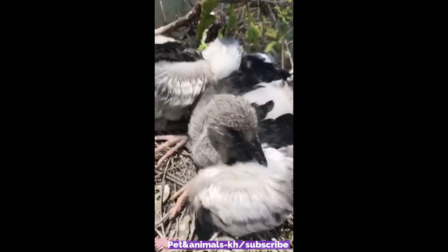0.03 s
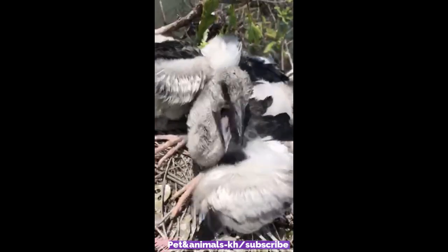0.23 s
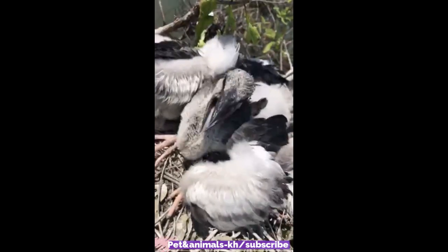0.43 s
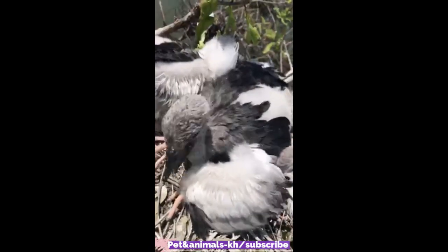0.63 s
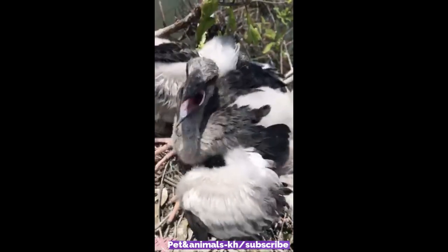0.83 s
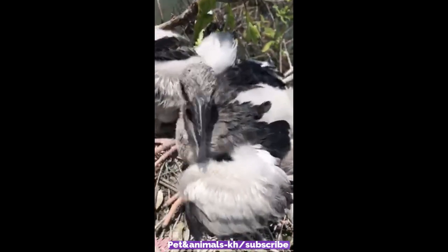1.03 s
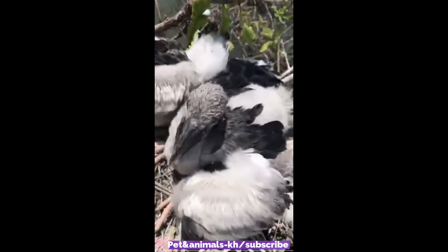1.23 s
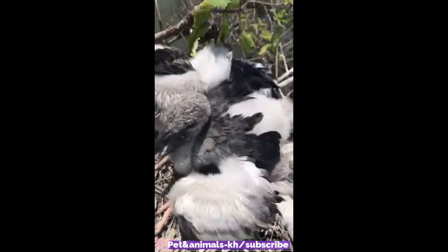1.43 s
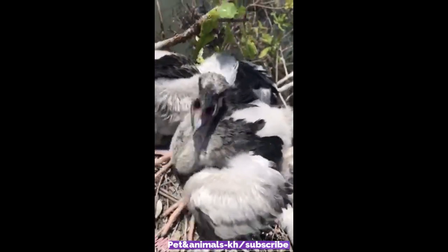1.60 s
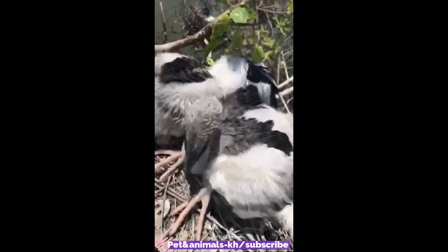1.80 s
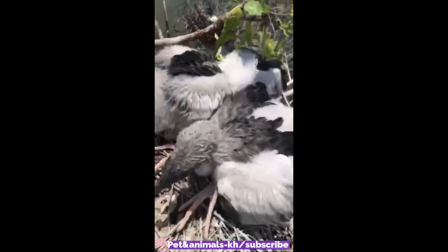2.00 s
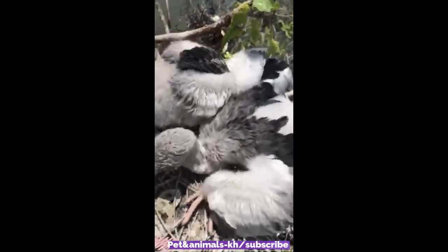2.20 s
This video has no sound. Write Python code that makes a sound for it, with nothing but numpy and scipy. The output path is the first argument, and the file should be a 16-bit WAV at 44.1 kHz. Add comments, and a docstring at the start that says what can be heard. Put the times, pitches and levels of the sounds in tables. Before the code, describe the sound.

Young storks cluck harshly in a nest among branches, twelve quick raspy calls in an even series, close and straight ahead. Feathers brush softly now and then, while light wind, a faint hum and a far bird sit underneath.

```python
"""Stork nestlings beg close by: twelve harsh clucks, about six a second.
Each cluck is a rattle of throat pulses that breaks into pairs, catches for an instant and trails off.
The pulses make the throat and bill ring, and the bill's opening colours the sound.
Twigs and branches scatter it. Feathers rustle softly, and behind lie faint wind, a low hum
and three chirps of a far bird."""
import sys
import numpy as np
from scipy import signal
from scipy.fft import rfft, irfft, next_fast_len
from scipy.io import wavfile
from scipy.ndimage import map_coordinates

SR = 44100
rng = np.random.default_rng(int(sys.argv[2]) if len(sys.argv) > 2 else 0)


def transcribe(signal):
    """Save signal, clipped to [-1, 1], as a 16-bit WAV file at the path in sys.argv[1]."""
    frames = np.atleast_2d(signal).T
    limited = np.clip(frames, -1, 1)
    pcm = np.round(limited * 32767).astype(np.int16)
    wavfile.write(sys.argv[1], SR, pcm)


N = 103635
T = np.arange(N) / SR
SIZE = 8192  # samples set aside for one cluck
HZ = np.fft.rfftfreq(SIZE, 1 / SR)

# Tone colour of the wind: (frequency [Hz], relative level [dB])
WIND_COLOUR = [(15, -37), (25, -13.5), (55, 2.5), (110, -2.5), (180, -4.5), (300, -5), (600, -4.5),
               (760, -9), (1100, -12), (1800, -16), (2700, -13), (3600, -16), (4400, -20), (5800, -21.5),
               (8600, -26.5), (9600, -42.5), (12000, -58.5), (15500, -65)]
# The wind's stereo spread: (frequency [Hz], side level against the middle [dB])
WIND_SPREAD = [(30, -22), (50, -14.5), (85, -17), (200, -14.5), (600, -21.5), (3000, -33.5), (12000, -24.5)]
# Loudness of the wind: (time [s], level [dB])
WIND_LEVEL = [(0, -64.5), (.5, -64.5), (1.0, -65.5), (1.35, -64), (1.75, -65), (2.2, -62), (2.35, -64)]
# Chirps of the far bird: (start [s], length [s], first pitch [Hz], last pitch [Hz], level [dB])
FAR_CHIRPS = [(.0, 0.12, 3880, 2410, -82), (.62, .06, 2980, 2670, -67.5), (1.342, 0.078, 3140, 2760, -66)]
# Feather rustles: (peak time [s], half length [s], level [dB], centre frequency [Hz])
FEATHER_RUSTLES = [(0.006, 0.025, -65.5, 3520), (1.354, 0.028, -63, 4800), (2.177, 0.017, -60, 4880)]
# Lone pulses just ahead of a cluck: (time [s], level [dB], cluck number [from 0])
LONE_PULSES = [(0.189, -44, 0), (1.4178, -42.5, 7)]
# Clucks: (start [s], swell time [s], last pulse before the catch [s], tail fade time [s], level [dB],
# relative tail level [dB], pulse rate [Hz], flutter depth [dB], limp depth [dB])
CLUCK_RHYTHMS = [(0.2002, 0.0027, .2298, 0.027, -39.5, -7.5, 374.6, 23, 17),
                 (0.361, 0.012, .3976, 0.038, -40, -5.5, 325.3, 24, 2.5),
                 (0.5308, 0.0067, .5813, .020, -38, -8.5, 318.8, 14, -3.5),
                 (0.685, 0.012, .7413, 0.034, -37.5, -9, 339.4, 9.5, 5),
                 (0.847, .013, .8968, 0.032, -36, -7.5, 340.5, 2, 6.5),
                 (1.0280, 0.0041, 1.0713, 0.028, -36.5, -15, 352.4, 5, 7),
                 (1.1760, 0.0081, 1.2203, 0.029, -35, -10.5, 357.5, 2.5, 9),
                 (1.4319, 0.003, 1.4677, 0.029, -36.5, -13.5, 316.9, 6, 6),
                 (1.5836, 0.012, 1.6310, 0.019, -38, -3, 343.5, 12, 0),
                 (1.7680, 0.0083, 1.8068, 0.027, -37.5, -7, 315.4, 1, 2),
                 (1.925, 0.0068, 1.9780, .024, -37, -12, 343, 3, -2),
                 (2.08, 0.011, 2.1240, 0.023, -34.5, -7.5, 336.1, 2, 6)]
# Ringing tones of throat and bill, a row per cluck, with levels against the main tone:
# (main tone [Hz], upper tone [dB], 2nd tone [Hz], 2nd tone [dB], 3rd tone [Hz], 3rd tone [dB],
# 4th tone [Hz], 4th tone [dB], treble [dB], treble edge [Hz])
BILL_SHAPES = [(648, 2.5, 2110, -2, 2850, -6.5, 3690, -7.5, -17.5, 6430),
               (597, 0, 1870, -7.5, 3050, -3, 3780, -5, -12, 10100),
               (700, -4, 2030, -6, 3250, -2, 3900, -1.5, -11.5, 9200),
               (676, 3, 2170, -1, 2750, -3, 3900, -5.5, -14, 5960),
               (625, -1.5, 1890, -7, 3070, 1, 3900, -4, -14, 10000),
               (643, -0.5, 1980, -5, 2850, -4, 3400, 0, -13, 7000),
               (640, 3, 2120, 0, 2820, -3, 3610, 1, -18, 6200),
               (660, 5.5, 2285, 2.5, 2820, -4, 3820, -6.5, -12, 5030),
               (614, -1, 1830, -8.5, 3090, -0.5, 4020, -5, -11.5, 9200),
               (617, 3, 2060, -3.5, 2950, -2, 3690, -2.5, -13, 6250),
               (650, 5.5, 2060, -1.5, 2420, 4.5, 3640, -6.5, -14.5, 5200),
               (636, 3, 2190, 2.5, 2470, 2, 4700, -13.5, -17.5, 4860)]
# The sharp click in each pulse: (frequency [Hz], relative level [dB])
CLICK_COLOUR = [(100, -36.5), (1300, -9.5), (2800, -8), (4500, -1.5), (5300, -3), (6500, -1), (9000, -24.5)]
# The faint fizz in each pulse: (frequency [Hz], relative level [dB])
FIZZ_COLOUR = [(100, -56), (1400, -31), (5000, -26.5), (8300, -33.5), (9300, -52.5), (12000, -52.5),
               (15500, -64.5)]
# Tone colour of the echo from the branches: (frequency [Hz], gain [dB])
ECHO_COLOUR = [(150, -4.5), (380, -8), (700, 21), (1200, -14), (3000, -2.5), (8000, -11.5)]


def amp(db):
    """Turn decibels into a gain."""
    return 10 ** (np.asarray(db) / 20)


def unit(x):
    """Scale a signal to an average (rms) level of 1."""
    return x / np.sqrt(np.mean(x ** 2) + 1e-20)


def along(points, hz):
    """Read between (frequency, value) points on a log frequency axis."""
    freqs, values = np.transpose(points)
    return np.interp(np.log(hz + 1), np.log(freqs + 1), values)


def wobble(rate):
    """A smooth curve through `rate` random values a second."""
    return map_coordinates(rng.standard_normal(int(N * rate / SR) + 4), [T * rate])


def filtered(x, response):
    """Scale each frequency in x by response(hz)."""
    size = next_fast_len(N + SR // 2)
    return irfft(rfft(x, size) * response(np.fft.rfftfreq(size, 1 / SR)), size)[..., :N]


def causal(gain):
    """A filter with this gain curve that rings only after it is struck (minimum phase)."""
    cepstrum = irfft(np.log(np.maximum(gain, 1e-6)))
    cepstrum[1:SIZE // 2] *= 2
    cepstrum[SIZE // 2 + 1:] = 0
    return np.exp(rfft(cepstrum))


def add(track, start, x):
    """Mix x into the track at `start` seconds."""
    part = track[round(start * SR):][:len(x)]
    part += x[:len(part)]


def wind():
    """Faint wind in the leaves: stereo noise that gently rises and falls."""
    noise = rng.standard_normal((2, N))
    mid, side = filtered(noise, lambda hz: amp(along(WIND_COLOUR, hz) + [0 * hz, along(WIND_SPREAD, hz)]))
    level_db = np.interp(T, *np.transpose(WIND_LEVEL)) + 0.91 * wobble(10.58)
    return unit(np.array([mid + side, mid - side])) * amp(level_db)


def hum():
    """A low tone that wavers in pitch and loudness, a little to the left."""
    pitch_hz = 88.5 + 4.14 * wobble(9.63)
    tone = np.sqrt(2) * np.sin(2 * np.pi * np.cumsum(pitch_hz) / SR)
    return tone * amp(-73 + 0.7 * wobble(6.58)) * amp([[4], [-4]])


def far_bird():
    """A small bird far off: thin, rough tones that slide down."""
    out = np.zeros(N)
    for start, length, first_hz, last_hz, db in FAR_CHIRPS:
        progress = np.clip((T - start) / length, 0, 1)
        hz = (first_hz + (last_hz - first_hz) * progress) * (1 + .07 * wobble(330))
        swell = np.sqrt(2 * np.abs(np.sin(np.pi * progress)))
        out += amp(db) * swell * np.sin(2 * np.pi * np.cumsum(hz) / SR)
    return out


def feathers(width_octaves=0.55, top_hz=8600):
    """Down brushes as the chicks shift: short, soft swells of hiss."""
    out = np.zeros(N)
    for peak, half, db, centre in FEATHER_RUSTLES:
        band = lambda hz: (hz < top_hz) / (1 + (np.log2((hz + 1) / centre) / width_octaves) ** 2) ** 2
        hiss = unit(filtered(rng.standard_normal(N), band))
        swell = np.exp(-((T - peak) / half) ** 2 / 2)
        out += hiss * amp(db + 0.88 * wobble(100)) * swell
    return out


def throat_ring(main_hz, upper_db, hz2, db2, hz3, db3, hz4, db4, treble_db, edge_hz):
    """Throat and bill answer one pulse with a sharp click and tones that swell and die."""
    # Tones, from the chest upward: (frequency [Hz], width [Hz], relative level [dB])
    tones = [(310, 328, -7), (main_hz, 291, 0), (901, 128, upper_db),
             (hz2, 423, db2), (hz3, 500, db3), (hz4, 726, db4)]
    tone_power = sum(np.abs(HZ * width / (hz ** 2 - HZ ** 2 + 1j * HZ * width)) ** 4 * amp(db) ** 2
                     for hz, width, db in tones)
    click = amp(treble_db + along(CLICK_COLOUR, HZ))
    treble_cut = 1 / (1 + (HZ / edge_hz) ** 34)
    fizz = amp(along(FIZZ_COLOUR, HZ) + treble_db + 13)  # grows with the treble
    high_ring = amp(-29) / (1 + ((HZ - 6670) / 415) ** 4)  # the same in every cluck
    gain = np.sqrt((tone_power + click ** 2) * treble_cut ** 2 + high_ring ** 2 + fizz ** 2)
    # Every other tone holds back its part of the pulse, so it swells late.
    lag = sum(2 * np.arctan2(HZ * width * 1.82, hz ** 2 - HZ ** 2) for hz, width, _ in tones[1::2])
    ring = irfft(causal(gain) * np.exp(-1j * lag))[:SIZE // 2]
    return ring / np.linalg.norm(ring)


def throat_pulses(swell_s, body_s, catch_s, tail_s, tail_db, rate_hz, flutter_db, limp_db):
    """Times and levels of one cluck's pulses: an uneven rattle, a short catch, then a fading tail."""
    count, jitter, scatter_db = 30, .125, 1.6
    rise_db_per_s, tail_hz, tail_fall_db, tail_flutter_db = 1048.5, 363.4, 18, 6.5
    gaps, sizes = rng.standard_normal((2, 2, count))
    steps = np.cumsum(1 + jitter * gaps, axis=1)
    steps -= steps[:, :1]
    early = body_s - steps[0] / rate_hz  # counted back from the catch
    late = steps[1] / tail_hz
    # In each three pulses, limp changes one and flutter weakens another, fully so from halfway on.
    depth = 0.55 + 0.45 * np.clip(2 * early / body_s, 0, 1)
    early_db = -rise_db_per_s * np.clip(swell_s - early, 0, swell_s)
    early_db -= depth * np.resize([0, limp_db, flutter_db], count)
    late_db = tail_db - tail_fall_db * (late / tail_s) ** 2
    late_db += tail_flutter_db * np.resize([1, 1, -2], count) / 3
    times = np.r_[np.maximum(early, 0), body_s + catch_s + late]
    levels_db = np.r_[early_db, late_db] + scatter_db * sizes.ravel()
    keep = np.r_[early > -1 / rate_hz / 2, late < 2 * tail_s]
    return times[keep], levels_db[keep]


def voice(times, levels_db, ring, rasp_db=-8, puff_s=0.0018):
    """Each pulse, with a puff of breath noise, sets the throat ringing."""
    pulses = np.bincount(np.round(times * SR).astype(int), amp(levels_db), SIZE)[:SIZE]
    puff = np.exp(-np.arange(SIZE) / SR / puff_s)
    breath_power = np.abs(signal.fftconvolve(pulses ** 2, puff / puff.sum())[:SIZE])
    breath = np.sqrt(breath_power) * rng.standard_normal(SIZE)
    return signal.fftconvolve(pulses + amp(rasp_db) * breath, ring)[:SIZE]


def twigs(sound, echo_db=-12.5, fade_s=0.014):
    """Twigs scatter the sound, adding a very short spray of echoes."""
    t = np.arange(SIZE) / SR
    echoes = rng.standard_normal(SIZE) * amp(-60 * t / fade_s) * (t > .001)
    return sound + amp(echo_db) * signal.fftconvolve(sound, echoes / np.linalg.norm(echoes))[:SIZE]


def nestlings(catch_s=.0095):
    """The chicks' clucks among the twigs, and the lone pulses that lead into two of them."""
    out = np.zeros(N)
    rings = [throat_ring(*shape) for shape in BILL_SHAPES]
    for cluck, ring in zip(CLUCK_RHYTHMS, rings):
        start, swell_s, catch_at, tail_s, db, tail_db, rate_hz, flutter_db, limp_db = cluck
        body_s = catch_at - start
        pulses = throat_pulses(swell_s, body_s, catch_s, tail_s, tail_db, rate_hz, flutter_db, limp_db)
        sound = twigs(voice(*pulses, ring))
        add(out, start, amp(db) * sound * np.sqrt((body_s + catch_s) * SR) / np.linalg.norm(sound))
    for start, db, number in LONE_PULSES:
        tick = twigs(voice(np.zeros(1), np.zeros(1), rings[number]))
        add(out, start, amp(db) * np.sqrt(SR / 363.4) * tick)  # level taken over one tail-pulse gap
    return out


def branch_echo(sound, fade_s=0.089):
    """The branches around throw back a faint, dull echo."""
    tail = rng.standard_normal(N) * amp(-60 * T / fade_s)
    echo = signal.fftconvolve(sound, tail / np.linalg.norm(tail))[:N]
    return amp(-19.5) * filtered(echo, lambda hz: amp(along(ECHO_COLOUR, hz)))


def scene():
    """The nest straight ahead, the wind around it."""
    clucks = nestlings()
    return clucks + branch_echo(clucks) + feathers() + far_bird() + wind() + hum()


def record(dry):
    """Cut away the very highest treble."""
    return filtered(dry, lambda hz: hz < 15700)


dry = scene()
out = record(dry)
transcribe(out)
```